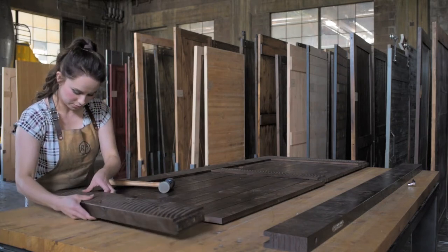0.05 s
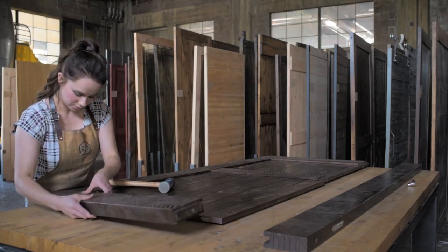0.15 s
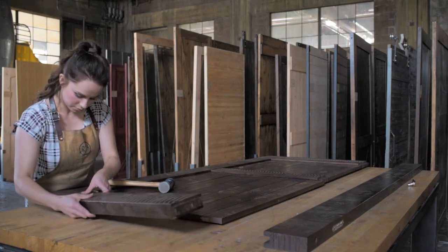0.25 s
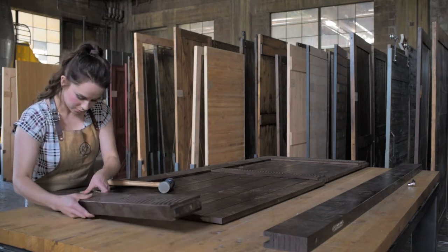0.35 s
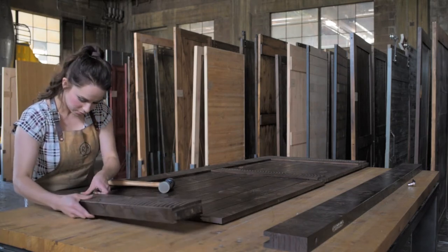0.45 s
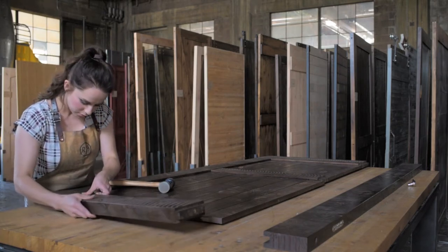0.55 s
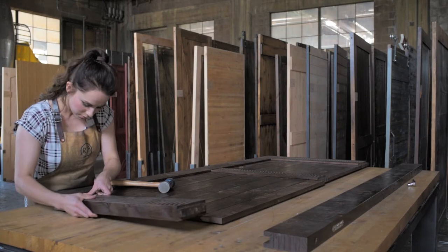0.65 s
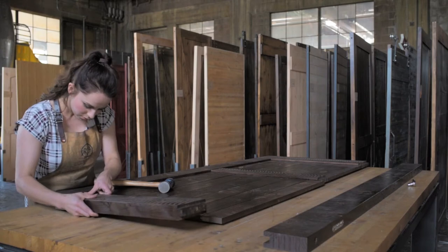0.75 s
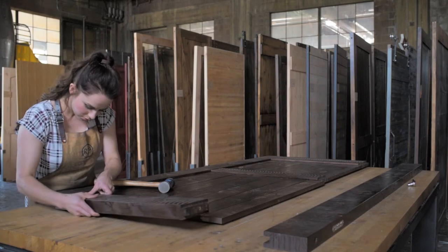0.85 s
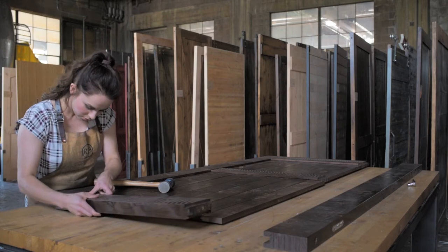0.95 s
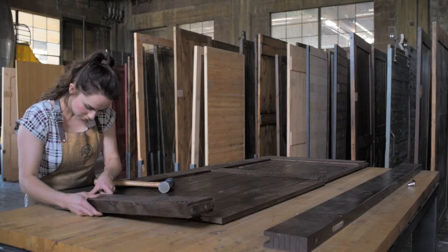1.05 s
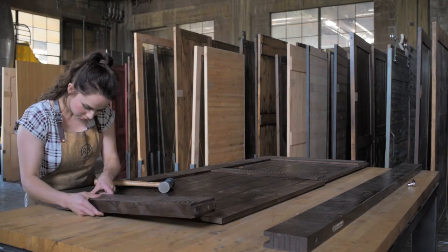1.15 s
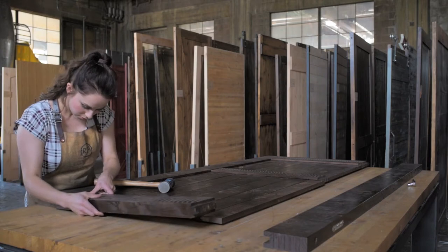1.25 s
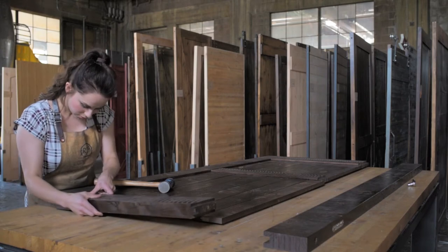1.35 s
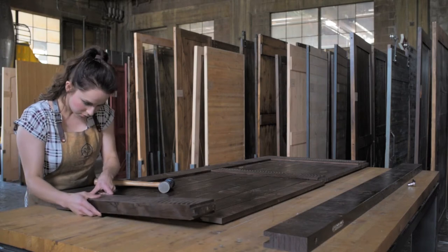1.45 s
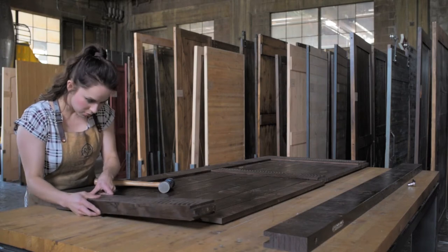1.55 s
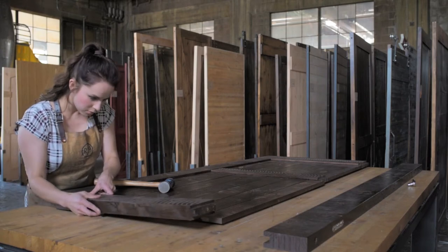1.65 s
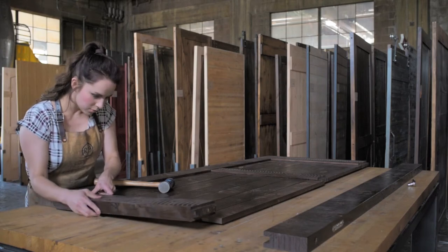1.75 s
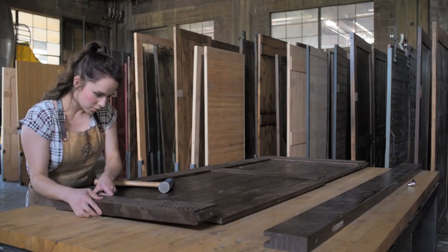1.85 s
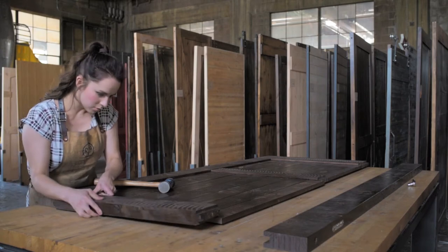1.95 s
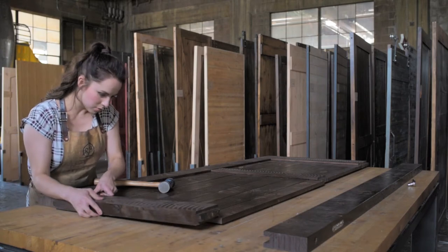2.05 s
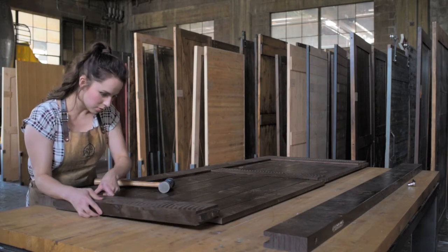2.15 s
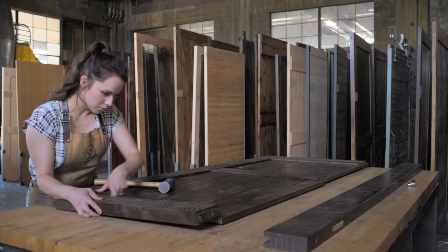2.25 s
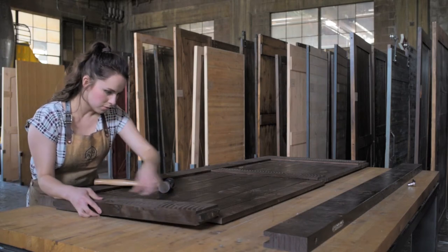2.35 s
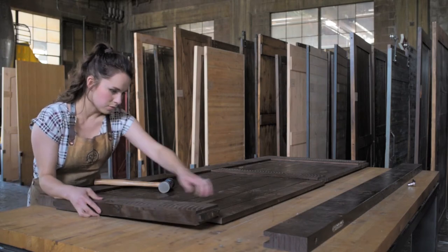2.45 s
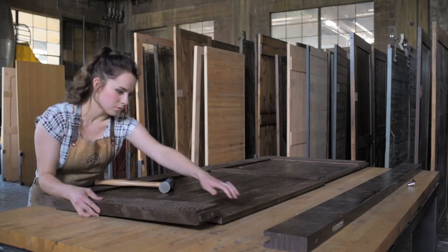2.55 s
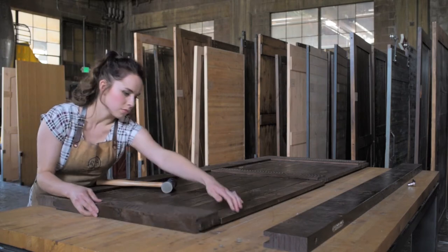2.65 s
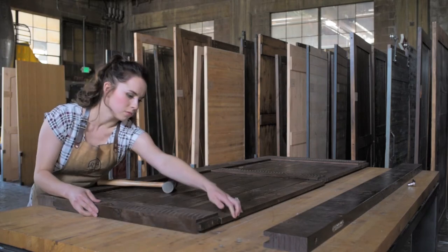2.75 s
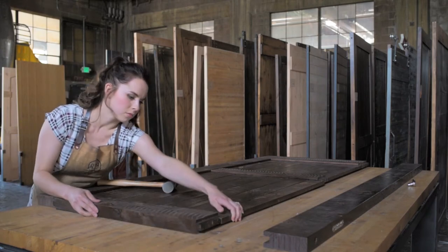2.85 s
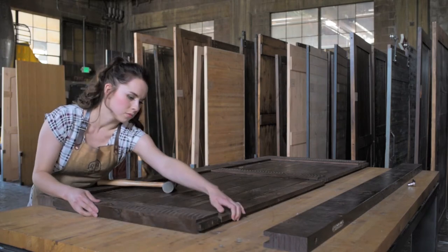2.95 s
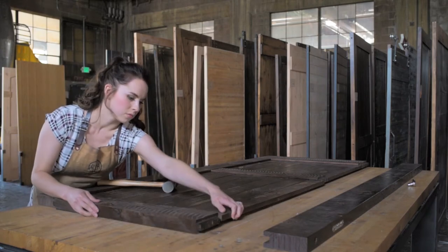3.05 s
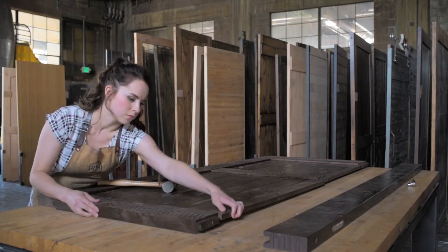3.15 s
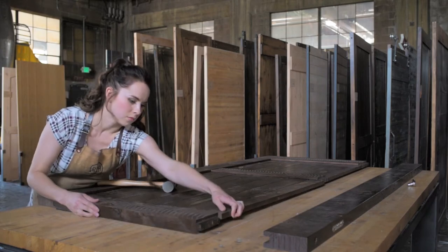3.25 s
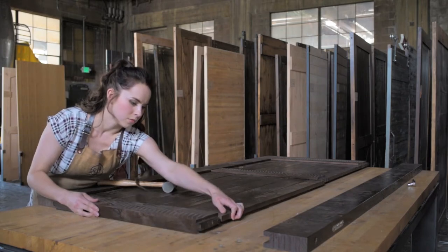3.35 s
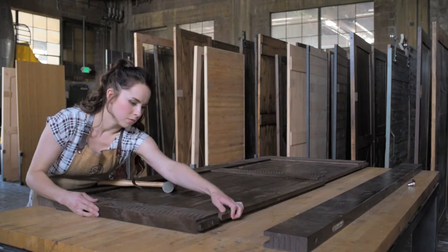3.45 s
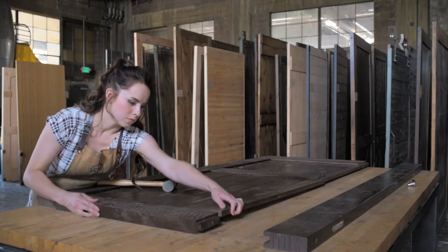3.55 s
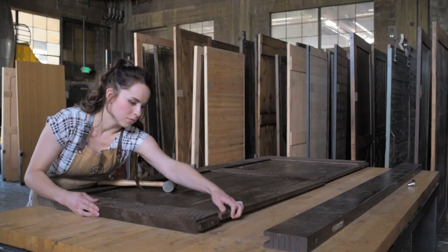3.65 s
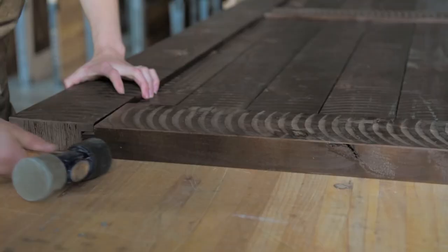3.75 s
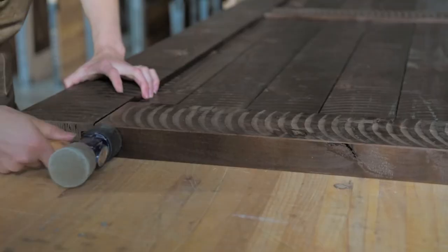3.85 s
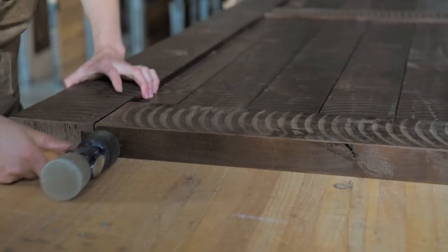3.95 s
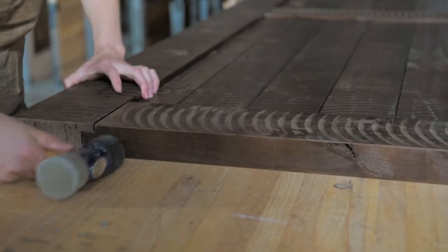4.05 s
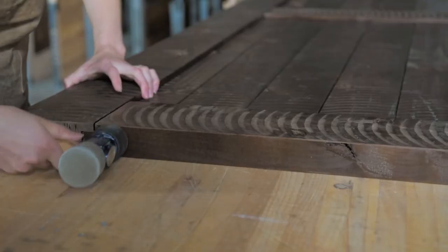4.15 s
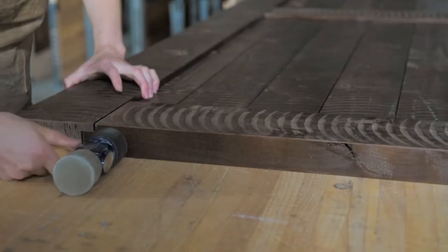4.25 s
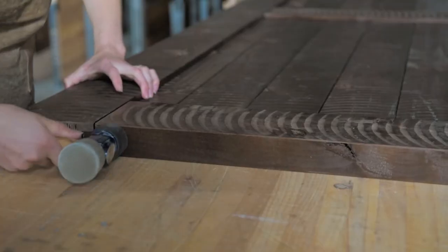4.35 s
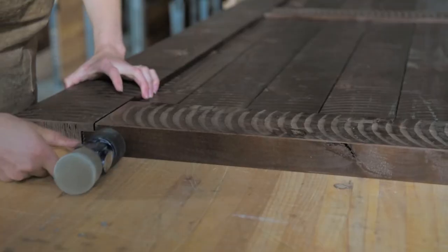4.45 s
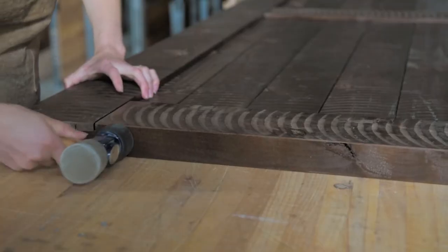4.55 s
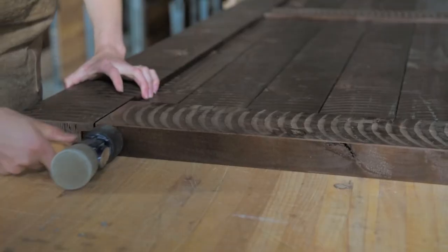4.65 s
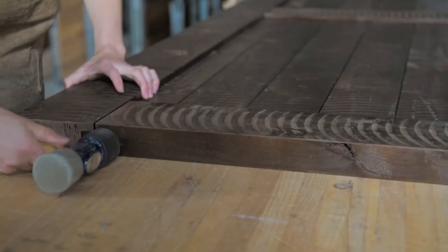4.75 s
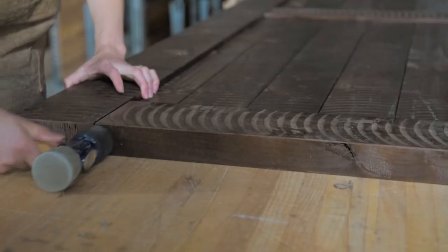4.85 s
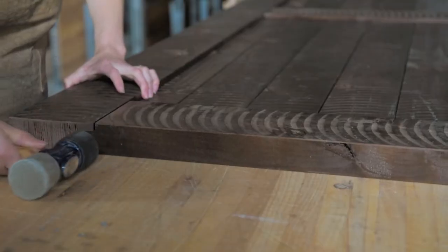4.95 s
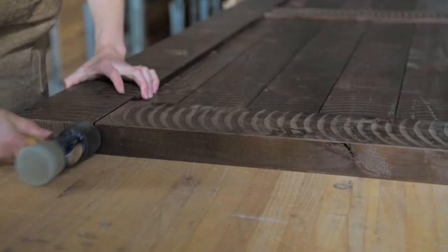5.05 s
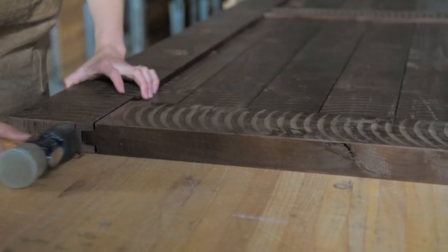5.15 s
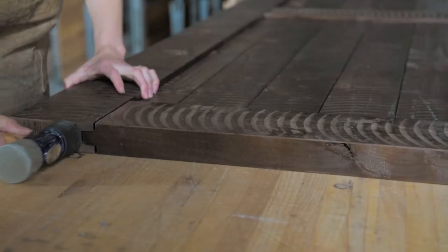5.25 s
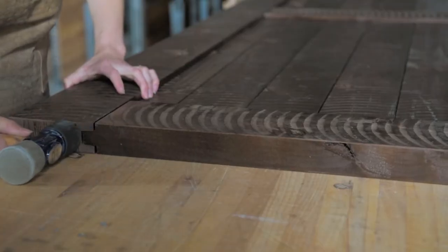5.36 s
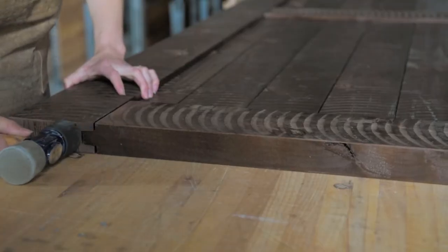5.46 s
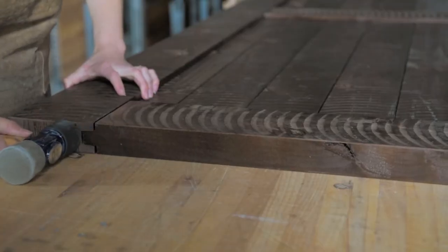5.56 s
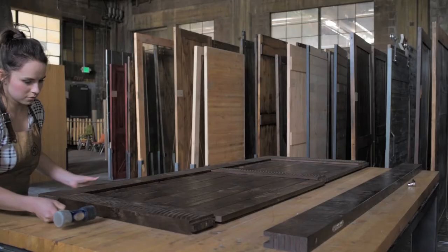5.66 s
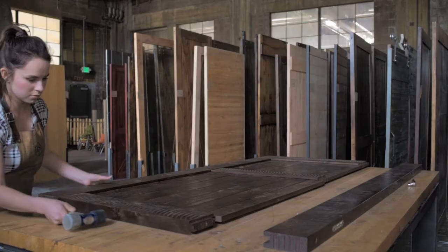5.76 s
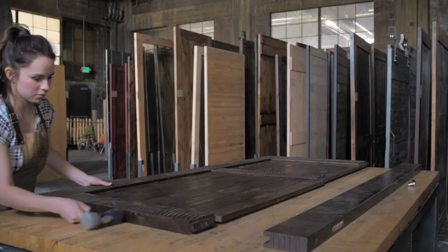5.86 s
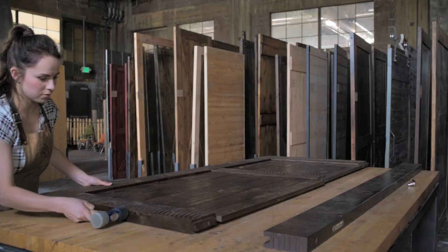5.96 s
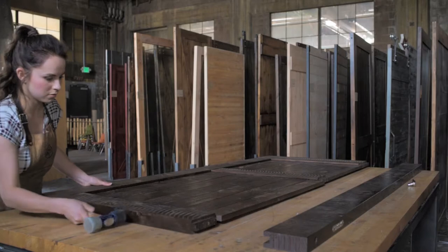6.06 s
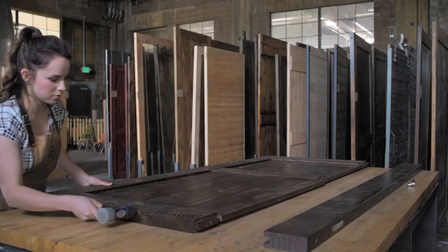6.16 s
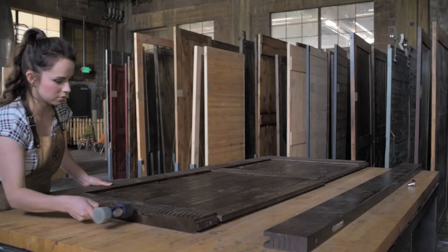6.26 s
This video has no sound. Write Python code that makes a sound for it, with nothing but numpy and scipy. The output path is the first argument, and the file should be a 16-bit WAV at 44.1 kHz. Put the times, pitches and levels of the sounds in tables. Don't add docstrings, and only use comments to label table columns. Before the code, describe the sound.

Close microphone at a wooden workbench in a reverberant hall, quiet air rumble behind. First sparse, muted knocks of a heavy rail, a firmer one, then a hard wooden drop that rings round the room. Brief sliding and fumbling taps fit the joint. Then a rubber mallet strikes the panel in a steady run of woody thuds with faint scuffs between, rests, and ends with double, rattling hits.

```python
import sys
import numpy as np
from scipy import signal
from scipy.fft import rfft, irfft, next_fast_len
from scipy.io import wavfile

SR = 44100
rng = np.random.default_rng(int(sys.argv[2]) if len(sys.argv) > 2 else 0)


def materialize(psi):
    bounded = np.clip(np.atleast_2d(psi).T, -1, 1)
    quanta = np.round(bounded * 32767).astype(np.int16)
    wavfile.write(sys.argv[1], SR, quanta)


def elevation(decibels):
    levels = np.asarray(decibels, float)
    return 10 ** (levels / 20)


N = 278222

# (frequency [Hz], t60 [s])
HALL_DECAY = [(80, 4.8), (250, 1.66), (700, 1.48), (1800, 1.18), (4000, 0.95), (9000, 0.79)]


def rms_one(x):
    return x / np.sqrt(np.mean(x ** 2) + 1e-20)


def at_hz(points, hz):
    points = np.array(points)
    return np.interp(np.log(hz), np.log(points[:, 0]), points[:, 1])


def add(out, s, piece):
    i = round(s * SR)
    out[i:i + len(piece)] += piece[:N - i]


def coloured(spectrum, size=N, grain_db=0):
    fast = next_fast_len(size)
    hz = np.maximum(np.fft.rfftfreq(fast, 1 / SR), 1)
    grain = elevation(grain_db * rng.exponential(1, fast).clip(0, 5))
    white = grain * rng.standard_normal(fast)
    shaped = irfft(rfft(white) * elevation(at_hz(spectrum, hz)), fast)
    return rms_one(shaped[:size])


def dying_noise(level, t60, size):
    t, out = np.arange(size) / SR, 0
    edges = 45 * 2 ** np.arange(0, 8.6, .5)
    for low, high in zip(edges, edges[1:]):
        hz = np.sqrt(low * high)
        decay_db = at_hz(level, hz) - 60 * t / at_hz(t60, hz)
        burst = rng.standard_normal(size) * elevation(decay_db)
        band = signal.butter(2, [low, high], "band", fs=SR, output="sos")
        out = out + signal.sosfilt(band, burst)
    return out / np.sqrt(np.sum(out ** 2))


def swells(rows, swing_db):
    t, gain = np.arange(N) / SR, 0
    for peak_s, db, rise_s, fall_s in rows:
        away = (t - peak_s) / np.where(t < peak_s, rise_s, fall_s)
        gain = gain + elevation(db - np.minimum(swing_db * away ** 2, 150))
    return gain


def ventilation():
    # (frequency [Hz], level [dB per Hz])
    air_spectrum = [(20, -21), (48, -7), (120, -1.5), (230, 0.5), (420, -8.5), (2000, -18.5), (5000, -31.5),
                    (16000, -72.5)]
    air = coloured(air_spectrum) * elevation(-54)
    echo = dying_noise([(100, -5), (450, 11), (3000, -14.0), (9000, -35)], HALL_DECAY, size=SR)
    add(air, 0, elevation(-19.5) * echo)
    return air


def motor_tone(hz, wander_hz, rough_db):
    wander = coloured([(1, 0), (4, -6), (30, -60), (100, -120)])
    tone = np.sqrt(2) * np.sin(2 * np.pi * np.cumsum(hz + wander_hz * wander) / SR)
    blur = coloured([(hz / 2, -50), (hz * .85, -8), (hz, 0), (hz * 1.7, -8), (hz * 2, -50), (hz * 4, -90)])
    return tone + elevation(rough_db) * blur


def far_machines():
    # (peak time [s], level [dB], swell [s], release [s])
    motor_load = [
        (.1, -50, 0.19, 0.23),
    ]
    # (peak time [s], level [dB], swell [s], release [s])
    deep_load = [
        (1.36, -56, 0.17, 0.18),
        (1.72, -60.5, .2, 0.13),
    ]
    motor_gain = swells(motor_load, swing_db=15) + elevation(-61.5)
    deep_gain = swells(deep_load, swing_db=13) + elevation(-74.5)
    drone = motor_gain * motor_tone(122, wander_hz=2.36, rough_db=-7.0)
    return drone + deep_gain * motor_tone(76, wander_hz=3, rough_db=-14)


def hall(impacts, colour, level_db):
    t = np.arange(2 * SR) / SR
    build_up = 1 - np.exp(-(t / 0.0024) ** 2)
    answer = dying_noise(colour, HALL_DECAY, size=2 * SR) * build_up
    return elevation(level_db) * signal.fftconvolve(impacts, answer)[:N]


def scuffs(drags, spectrum):
    return coloured(spectrum, grain_db=3.5) * swells(drags, swing_db=27.5)


def bench_scuffs():
    # (peak time [s], level [dB], swell [s], release [s])
    wood_drags = [
        (.835, -60, 0.065, 0.037),
        (2.735, -47, 0.06, 0.034),
        (3.605, -53.5, 0.096, 0.076),
        (3.72, -55, 0.057, 0.047),
    ]
    # (peak time [s], level [dB], swell [s], release [s])
    rubber_drags = [(4.365, -63.5, .1, .05), (4.455, -68, .05, .05), (4.592, -63, .06, 0.046),
                    (4.83, -63, 0.046, .04), (5.83, -69, .04, .08)]
    # (frequency [Hz], level [dB per Hz])
    wood_spectrum = [(300, 3.5), (1000, 25.5), (3000, 16), (6000, 0.5), (9000, -17.5), (15000, -22)]
    # (frequency [Hz], level [dB per Hz])
    rubber_spectrum = [(500, -23), (2000, 4), (4500, -2), (7000, -7), (10000, -16.5), (15000, -30)]
    return scuffs(wood_drags, wood_spectrum) + scuffs(rubber_drags, rubber_spectrum)


def slaps(events, t60_ms):
    out, ms = np.zeros(N), np.arange(4096) * 1000 / SR
    for s, level_db, held_ms, tilt_db in events:
        spectrum = [(100, -1.5), (400, 8.0), (1500, -7), (3500, 1.1 * tilt_db), (14400, 4.44 * tilt_db)]
        noise = coloured(spectrum, size=4096)
        grit = elevation(2.5 * rng.exponential(1, 256).clip(0, 4)).repeat(16)
        noise = noise * rms_one(np.convolve(grit, np.hanning(40), "same"))
        fade_db = 60 * np.maximum(ms - held_ms, 0) / t60_ms
        fade = elevation(-fade_db) + elevation(-22.5 - fade_db / 4)
        onset = np.minimum(ms / 0.21, 1) ** 2
        add(out, s, noise * onset * elevation(level_db) * fade)
    dull = signal.butter(2, 11500, fs=SR, output="sos")
    return signal.sosfilt(dull, out)


def face_slaps():
    # (time [s], level [dB], held [ms], treble tilt [dB])
    rail_slaps = [
        (.47, -50, 1.9, -10),
        (.7143, -41, 4.5, -10.5),
        (1.9955, -37, 6.9, -15.5),
        (2.735, -44.5, 2.2, -6),
        (2.7591, -24.5, 2.7, -14.5),
        (3.575, -51, 1.9, -6.5),
        (3.629, -52, 2.2, -5.5),
        (3.724, -60, 3, -6),
        (3.7435, -43.5, 6.7, -7),
    ]
    # (time [s], level [dB], held [ms])
    mallet_slaps = [(4.0099, -32.5, 6), (4.279, -29.5, 5.1), (4.526, -27.5, 2.7), (4.786, -25, 4.6),
                    (5.032, -30, 4.5), (5.288, -27.5, 4.3), (5.976, -34, 5), (6.016, -45, 1.1),
                    (6.035, -47.5, .85), (6.219, -36, 8.7), (6.229, -29.5, 2.8), (6.234, -36, 2.9)]
    tilted = [(*row, -8) for row in mallet_slaps]
    return slaps(rail_slaps, t60_ms=33) + slaps(tilted, t60_ms=17.8)


def knocks(events, modes, crowd, contact_ms, stiffens, place_ms, spread_ms, crowd_db, thud_turns,
           crack_db, bass_cut_hz):
    near, impacts, t = np.zeros(N), np.zeros(N), np.arange(SR // 3) / SR
    hz, db, t60 = np.transpose(modes)[:, :, None]
    late = np.maximum(t - spread_ms / 1000 * np.sqrt(250 / hz), 0)
    rings = elevation(db - 60 * late / t60) * np.sin(2 * np.pi * hz * late)
    place = np.cos(2 * np.pi * hz[:, 0] * place_ms / 1000)
    crowd, blow_s = np.array(crowd), -1
    blunt = signal.butter(4, 2500, fs=SR, output="sos")
    for s, ring_db, thud_hz, thud_db in events:
        share = place * elevation(2.5 * rng.standard_normal(len(hz)))
        touch_ms = contact_ms * elevation(-stiffens * ring_db)
        u = t[:400] * 1000 / max(touch_ms, .1) * 6
        push = u ** 2 * np.exp(-u)
        body = -np.convolve(share @ rings, push)
        add(near, s, elevation(ring_db) * body / np.abs(body).max())
        rattle = np.convolve(dying_noise(crowd[:, :2], crowd[:, ::2], size=5000), push)
        add(near, s, elevation(ring_db + crowd_db) * rattle / np.abs(rattle).max())
        swell = t * thud_hz / thud_turns
        thud = swell * np.exp(1 - swell) * np.sin(2 * np.pi * thud_hz * t)
        add(near, s, elevation(thud_db) * thud)
        crack = np.diff(push) / np.diff(push).max()
        crack_level = elevation(1.3 * ring_db + crack_db)
        add(near, s, crack_level * signal.sosfilt(blunt, crack))
        blow_s = s if s - blow_s > .025 else blow_s
        add(impacts, blow_s, max(elevation(ring_db - 0.5), elevation(thud_db)) * crack)
    bass_cut = signal.butter(2, bass_cut_hz, "high", fs=SR, output="sos")
    return signal.sosfilt(bass_cut, near), impacts


def rail(contacts):
    # (time [s], ring level [dB], thud frequency [Hz], thud level [dB])
    rail_knocks = [(.48, -43.5, 116, -35.5), (.7145, -37, 260, -32.5), (.738, -49, 250, -41),
                   (1.108, -53, 126, -44), (1.9942, -27.5, 450, -25.5), (2.008, -45, 480, -33),
                   (1.997, -33, 170, -37), (2.7588, -6, 260, -10), (2.7605, -17, 423, -6.5),
                   (2.94, -63, 90, -33), (3.553, -40, 203, -56), (3.574, -42, 246, -45),
                   (3.585, -36.5, 300, -39), (3.605, -43, 430, -36), (3.629, -39.5, 416, -34),
                   (3.66, -55, 276, -41), (3.712, -40, 360, -37), (3.724, -36.5, 300, -30),
                   (3.7425, -35.5, 430, -25), (3.753, -39, 321, -22)]
    # (frequency [Hz], level [dB], t60 [s])
    rail_modes = [(170, -0.5, 0.024), (260, -8.5, 0.16), (340, -21.5, 0.11), (414, -10, 0.07),
                  (436, 5, 0.13), (570, -1, 0.15), (609, -9, 0.15), (800, 6, 0.062), (1030, 7, 0.057),
                  (1150, -3, 0.058), (1315, -7, 0.032), (1435, 18, 0.028), (2040, 2, 0.035),
                  (2500, 8.5, 0.025)]
    # (frequency [Hz], level [dB], t60 [s])
    rail_crowd = [(150, -5, 0.076), (300, -4, 0.3), (553, 0, 0.22), (1210, 15.5, 0.034),
                  (2420, 17.5, 0.021), (4880, -1, 0.013)]
    # (frequency [Hz], level [dB])
    rail_echo = [(60, -10), (150, 0.5), (300, 7.5), (550, 6.5), (1000, 4), (2000, -3.5), (4000, -16),
                 (12000, -39)]
    near, impacts = knocks(rail_knocks, rail_modes, rail_crowd, contact_ms=0.74, stiffens=0.34,
                           place_ms=0.081, spread_ms=2.34, crowd_db=1, thud_turns=0.94,
                           crack_db=8, bass_cut_hz=115)
    return near + contacts + hall(impacts + elevation(-19.0) * contacts, rail_echo, level_db=-14.5)


def mallet(contacts):
    # (time [s], ring level [dB], thud frequency [Hz], thud level [dB])
    mallet_blows = [(4.012, -22, 257, -18.5), (4.048, -37, 190, -33.5), (4.2805, -15, 273, -13),
                    (4.289, -21.5, 300, -14), (4.5275, -14.5, 290, -8), (4.7905, -14, 290, -8),
                    (5.035, -14, 278, -6.5), (5.292, -15.5, 260, -6), (5.9775, -19.5, 190, -13.5),
                    (6.001, -25, 264, -21.5), (6.037, -33.5, 246, -25.5), (6.2195, -18, 214, -24),
                    (6.230, -17.5, 432, -16.5), (6.2375, -17.5, 338, -4.5), (6.260, -22.5, 340, -16.5),
                    (6.279, -48, 322, -15.5)]
    # (frequency [Hz], level [dB], t60 [s])
    panel_modes = [(190, -5.5, 0.12), (260, -5.5, 0.75), (290, 4, 0.17), (304, -7, 0.3), (405, 2, 0.16),
                   (448.7, 14.5, 0.19), (545, 9.5, 0.14), (771, 28.5, 0.045), (1037, 17, 0.28),
                   (1060, -3, 0.36), (1144, 14, 0.21), (1310, 8, 0.09), (1520, 2, 0.1), (2040, 12, 0.055)]
    # (frequency [Hz], level [dB], t60 [s])
    panel_crowd = [(162, -20, 0.46), (300, -5.5, 0.12), (650, -13.5, 0.22), (1200, 6, 0.071),
                   (2500, 4.5, 0.07), (4840, 3, 0.036)]
    # (frequency [Hz], level [dB])
    mallet_echo = [(60, 2), (150, 2.5), (280, 11.5), (450, 0), (1000, 0), (2500, -4), (5000, -4),
                   (12000, -14.5)]
    near, impacts = knocks(mallet_blows, panel_modes, panel_crowd, contact_ms=1.213, stiffens=0.27,
                           place_ms=0.14, spread_ms=1.95, crowd_db=-1, thud_turns=0.71,
                           crack_db=0.5, bass_cut_hz=203)
    return near + contacts + hall(impacts + elevation(-13.5) * contacts, mallet_echo, level_db=-17.5)


def scene():
    rail_part = np.arange(N) < 3.7695 * SR
    contacts = face_slaps() + bench_scuffs()
    background = ventilation() + far_machines()
    return (background + rail(contacts) * rail_part + mallet(contacts * ~rail_part))[None]


def roll_off(x):
    return signal.sosfilt(signal.butter(12, 16410, fs=SR, output="sos"), x)


def record(dry):
    mic = signal.sosfilt(signal.butter(2, 28, "high", fs=SR, output="sos"), dry)
    mic = 1.5 * np.tanh(mic / 1.5)
    mic = mic + elevation(-80.5) * rng.standard_normal(dry.shape)
    mic = signal.sosfilt(signal.cheby2(12, 60, 16300, fs=SR, output="sos"), mic)
    return roll_off(mic)


dry = scene()
out = record(dry)
materialize(out)
```